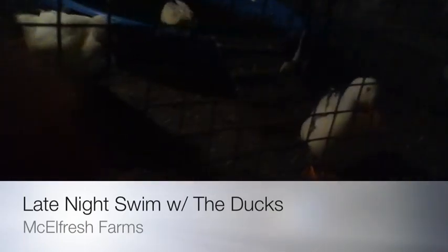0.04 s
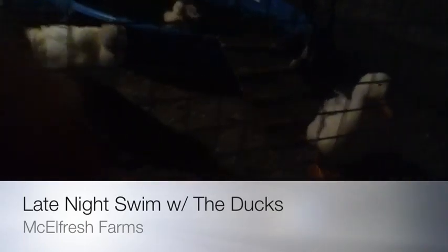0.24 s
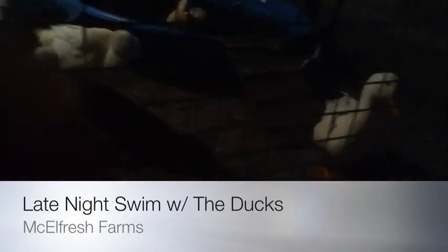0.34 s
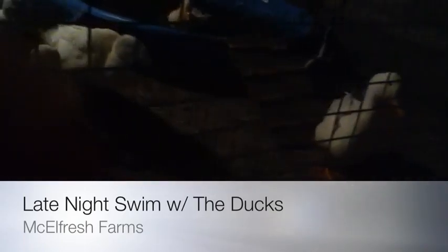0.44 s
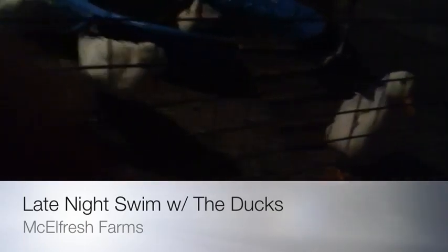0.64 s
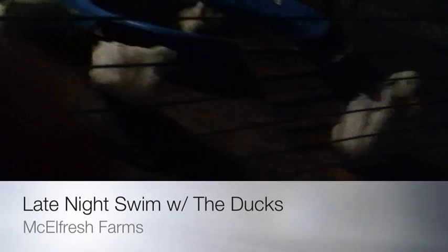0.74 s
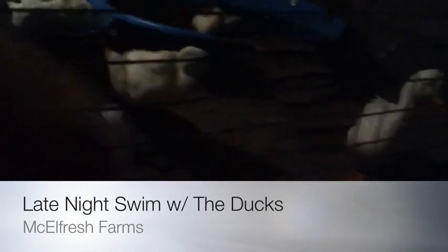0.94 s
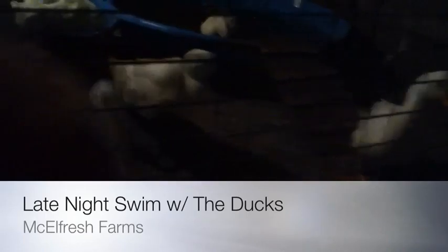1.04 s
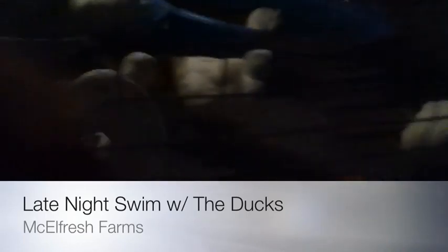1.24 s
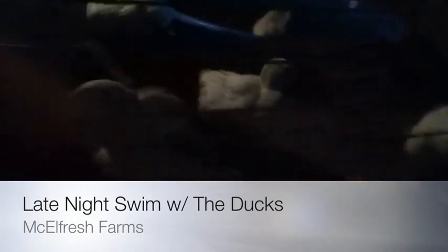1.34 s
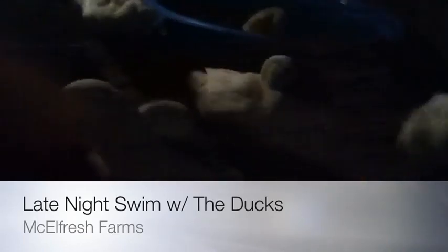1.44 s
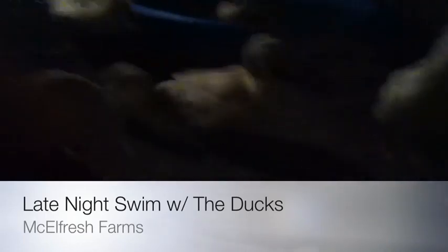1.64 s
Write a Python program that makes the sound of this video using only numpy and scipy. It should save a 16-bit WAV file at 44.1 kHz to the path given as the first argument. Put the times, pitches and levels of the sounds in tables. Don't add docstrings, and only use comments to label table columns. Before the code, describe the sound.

Overlapping duck calls: soft rasps and a knock first, then loud clipped quacks near the phone, thinning to faint calls and a tiny peep; quiet night air, faint hum, short echoes off a shed wall.

```python
import sys
import numpy as np
from scipy import signal
from scipy.io import wavfile
from scipy.ndimage import uniform_filter1d

SR = 44100
rng = np.random.default_rng(int(sys.argv[2]) if len(sys.argv) > 2 else 0)


def voltage_ratio(decibels):
    exponent = np.asarray(decibels, float) / 20
    return 10 ** exponent


def wav_out(sig):
    wavfile.write(sys.argv[1], SR, np.round(np.clip(np.atleast_2d(sig).T, -1, 1) * 32767).astype(np.int16))


N = 74970


def near_hens():
    # start_s, length_s, peak_db, top_pulse_rate_hz, share_of_call_at_top_effort
    quick = [
        (.3855, 0.032, -6.5, 207.4, 0.44),
        (.6688, 0.04, -7.5, 172.6, 0.36),
        (1.0698, .064, -10, 163.3, .42),
        (1.1756, 0.031, -6.5, 204, .5),
    ]
    slow = [
        (.2768, 0.05, -13, 127.8, 0.22),
        (.5618, 0.045, -7.5, 106.3, 0.35),
        (1.3572, 0.03, -10.5, 99.4, 0.453),
        (1.6763, 0.0213, -19.5, 136.9, 0.443),
    ]
    # mode_hz, width_hz, level_db
    quick_bill = [(162, 101, -15.5), (600, 104, -8.5), (959, 101, -6), (1299, 99, 5), (1600, 123, 4),
                  (1950, 344, 7), (2808, 1200, 0.5), (3675, 330, -1.5), (4600, 240, -5.5), (6010, 240, -10),
                  (7690, 680, -13)]
    slow_bill = [(163, 78, -16), (565, 107, -4.5), (1010, 165, 0), (1295, 64, 3), (1600, 100, -4.5),
                 (1894, 126, 1), (2670, 860, 1), (3454, 157, -5.5), (4250, 100, -8.5), (5920, 390, -2.5),
                 (8780, 1900, -14.5)]
    out = np.zeros(N)
    for calls, bill in ((quick, quick_bill), (slow, slow_bill)):
        for s, *call in calls:
            add(out, s, quack(*call, bill))
    return out


def quack(length, peak_db, rate_hz, top, bill):
    at, pulse_db = folds(length, rate_hz, top, sag=0.35, edge_db=-9, wobble_db=1.2)
    return voltage_ratio(-1) * voiced(at, peak_db + pulse_db, bill, detune=0.025, rise_s=0.00022, drop=0.16)


def folds(length, rate_hz, top, sag, edge_db, wobble_db):
    jitter = 0.025
    u = np.arange(0, length, 1 / SR) / length
    rising = u < top
    slack = np.where(rising, (top - u) / top, (u - top) / (1 - top)) ** 2
    chance = rng.standard_normal((30, 2))
    rate = rate_hz * (1 - sag * slack * np.where(rising, top, 1))
    turns = 1 + np.cumsum(rate) / SR
    at = np.flatnonzero(np.diff(np.floor(turns), prepend=0))[:30]
    late = jitter * SR / rate_hz * chance[:len(at), 0] * (at > 0)
    return at + late.astype(int), edge_db * slack[at] + wobble_db * chance[:len(at), 1]


def voiced(at, pulse_db, modes, detune, rise_s, drop):
    glide_s, air_s, air_share = 0.00058, 0.0025, 0.7
    brighten = 1.463
    mode_wobble_db = 2.5
    hz, width, db = np.transpose(modes)[:, :, None]
    high = hz > 2300
    t, out = np.arange(1000) / SR, np.zeros(8000)
    chance = rng.standard_normal((30, 2, len(modes), 1))
    air = rng.standard_normal((16, len(modes), 100))
    glide = drop * glide_s * (1 - np.exp(-t / glide_s))
    alternate = np.arange(len(modes))[:, None] / 2
    rise = (1 - np.exp(-t / rise_s)) ** 2
    decay = np.exp(-np.pi * width * t)
    for k, (i, level_db) in enumerate(zip(at, pulse_db)):
        turn = hz * (1 + detune * chance[k, 0]) * (t + glide) + alternate
        rough = uniform_filter1d(np.repeat(air[k % 16], repeats=10, axis=1), size=20, axis=1)
        breath = high * air_share * np.exp(-t / air_s) * rough
        wobble_db = mode_wobble_db * (1 + high) / 2 * chance[k, 1]
        gain = voltage_ratio(db + level_db * np.where(high, brighten, 1) + wobble_db)
        pulse = gain * rise * (decay + breath) * np.sin(2 * np.pi * turn)
        add(out, i / SR, pulse.sum(0))
    return out


def far_birds():
    # start_s, length_s, peak_db, pulse_rate_hz, ring_hz
    rasps = [(.0, 0.038, -29.5, 154.6, 1450), (.056, 0.012, -25, 90.2, 1950),
             (0.201, 0.073, -14, 63.2, 1557), (0.337, 0.027, -18, 114.8, 1616),
             (0.622, 0.056, -16, 113.6, 1600), (0.8265, 0.042, -15.5, 79.74, 1950),
             (0.863, 0.018, -17.5, 102.1, 1650), (0.89, 0.083, -30.5, 130, 2037),
             (0.967, .01, -23.5, 96, 1926), (1.005, 0.046, -16.5, 124.2, 1616),
             (1.033, 0.041, -11.5, 80.6, 1950), (1.141, 0.11, -30, 137.7, 1600),
             (1.399, 0.061, -14.5, 65.26, 1673), (1.476, 0.078, -17.5, 64.2, 1667),
             (1.518, .03, -25, 81.2, 1527), (1.647, 0.019, -22.5, 94.3, 1910)]
    mutters = [
        (0.134, 0.043, -39, 115.2, 520),
        (0.257, 0.082, -18, 124.9, 619),
        (0.642, 0.033, -23.5, 150, 580),
        (0.712, 0.019, -20, 88, 620),
        (0.815, 0.03, -30.5, 101, 300),
        (0.897, 0.17, -43, 88.5, 293),
        (1.048, 0.06, -19, 132.4, 600),
        (1.168, 0.0082, -11, 150, 600),
    ]
    out = np.zeros(N)
    for calls in (rasps, mutters):
        for s, *call in calls:
            add(out, s, rasp(*call))
    return out


def rasp(length, peak_db, rate_hz, ring_hz):
    # ratio_to_ring, width_hz, level_db
    rings = [(0.998, 167.4, -3.5), (0.834, 224, -8.5), (1.2, 240, -8), (0.6, 133, -20.5), (1.8, 240, -21)]
    at, pulse_db = folds(length, rate_hz, top=0.43, sag=0.042, edge_db=-5.5, wobble_db=1.5)
    modes = [(ratio * ring_hz, width, db) for ratio, width, db in rings]
    if ring_hz > 1000:
        modes.append((4750, 193, -21))
    return voltage_ratio(peak_db + 19) * voiced(at, pulse_db, modes, detune=0.045, rise_s=0.0024, drop=-0.12)


def peep():
    # time_s, pitch_hz, level_db
    course = [
        (1.63, 640, -42),
        (1.64, 700, -36),
        (1.657, 770, -36),
        (1.665, 620, -37),
        (1.675, 560, -42),
    ]
    s, hz, db = np.transpose(course)
    t = np.arange(N) / SR
    turn = 2 * np.pi * np.cumsum(np.interp(t, s, hz)) / SR
    level_db = np.interp(t, [s[0] - 0.006, *s, s[-1] + 0.015], [-70, *db, -70], -120, -120)
    return voltage_ratio(level_db) * (np.sin(turn) + voltage_ratio(-6) * np.sin(2 * turn))


def ground():
    # time_s, level_db, pitch_hz
    knocks = [
        (0.1965, -21.5, 860),
        (0.803, -31, 600),
        (0.809, -25.5, 500),
        (1.6127, -25, 505),
    ]
    # centre_s, spread_s, level_db
    rustles = [
        (0.187, .025, -45),
        (0.372, 0.018, -46),
        (0.808, 0.041, -46.5),
        (0.958, 0.014, -46),
        (1.312, 0.0033, -47),
        (1.562, 0.046, -47),
        (1.673, 0.03, -53),
    ]
    # frequency_hz, level_db
    straw = [(1500, -19), (3000, -4.5), (5000, -7), (9000, -11), (13000, -14.5), (16000, -47)]
    out, click, t = np.zeros(N), np.eye(1, 2000)[0], np.arange(N) / SR
    for s, db, hz in knocks:
        body = ring(click, hz, 160)
        thud = voltage_ratio(-21) * ring(click, 230, 56)
        scrape = 0.5 * ring(click, 1600, 1500)
        add(out, s, voltage_ratio(db) * (body + thud + scrape))
    stir = sum(voltage_ratio(db) * np.exp(-0.5 * ((t - s) / spread) ** 2) for s, spread, db in rustles)
    crackle = voltage_ratio(2.6 * evened(uniform_filter1d(rng.standard_normal(N), size=60)))
    return out + stir * crackle * hiss(straw, patchy_db=2)


def night():
    # frequency_hz, level_db (per Hz)
    air = [(18, -32), (30, -10.5), (486, -12.5), (740, -4), (1670, 0.5), (2170, -5), (2830, -14),
           (6210, -14), (16000, -31)]
    # mode_hz, width_hz, level_db
    pump = [(82, 20, -56), (150, 25, -52.5)]
    hum = sum(voltage_ratio(db) * evened(ring(rng.standard_normal(N), hz, width)) for hz, width, db in pump)
    return voltage_ratio(-44) * hiss(air, patchy_db=-4) + hum


def yard(x):
    # frequency_hz, t60_s
    decay = [(250, 0.23), (660, 0.11), (1400, 0.2), (4500, 0.23), (10000, 0.06)]
    taps = np.zeros(SR // 2)
    at = np.arange(260, 20000, 20)
    taps[at + rng.integers(0, 20, len(at))] = rng.choice([-1., 1.], len(at))
    hz, t, z = signal.stft(taps, SR, nperseg=256)
    dying = voltage_ratio(-60 * t / read(decay, hz)[:, None])
    tail = signal.istft(z * dying, SR, nperseg=256)[1]
    return signal.fftconvolve(x, tail / np.linalg.norm(tail))[:N]


def evened(x):
    return x / np.sqrt(np.mean(x ** 2) + 1e-20)


def read(points, hz):
    f, value = np.transpose(points)
    return np.interp(np.log(hz + 1), np.log(f + 1), value)


def add(mix, s, sound):
    part = mix[max(round(s * SR), 0):][:len(sound)]
    part += sound[:len(part)]


def ring(x, hz, width_hz):
    r, w = np.exp(-np.pi * width_hz / SR), 2 * np.pi * hz / SR
    return signal.lfilter([0, r * np.sin(w)], [1, -2 * r * np.cos(w), r * r], x)


def hiss(spectrum, patchy_db):
    hz = np.fft.rfftfreq(512, 1 / SR)
    a, b, patches = rng.standard_normal((N // 128 + 5, 257, 3)).T
    patches = uniform_filter1d(patches, size=6, axis=0)
    patches = evened(uniform_filter1d(patches, size=14, axis=1))
    z = (a + 1j * b) * voltage_ratio(read(spectrum, hz)[:, None] + patchy_db * patches)
    return evened(signal.istft(z, nperseg=512, noverlap=384)[1][:N])


def scene():
    near, far = near_hens(), far_birds() + peep()
    echoes = yard(voltage_ratio(-12) * near + voltage_ratio(-10) * far)
    return (near + far + echoes + ground() + night())[None]


def low_pass(x):
    return signal.sosfilt(signal.butter(12, 16440, fs=SR, output="sos"), x)


def record(dry):
    ceiling, mic_low_hz, edge_hz = 0.97, 71.4, 16000
    x = signal.sosfilt(signal.butter(3, mic_low_hz, "high", fs=SR, output="sos"), dry)
    x = np.clip(x, -ceiling, ceiling)
    lowpass = signal.firwin(255, edge_hz, window=("kaiser", 9), fs=SR)
    x = signal.oaconvolve(x, lowpass[None], "same")
    return low_pass(x)


dry = scene()
out = record(dry)
wav_out(out)
```